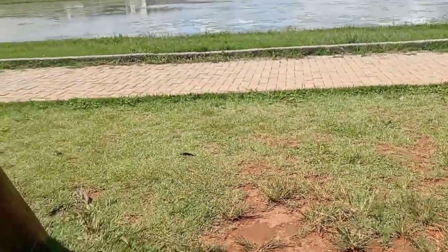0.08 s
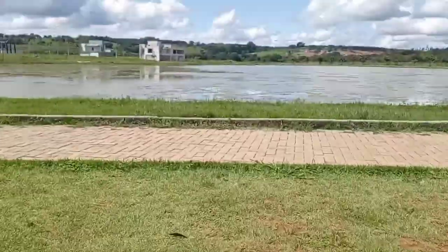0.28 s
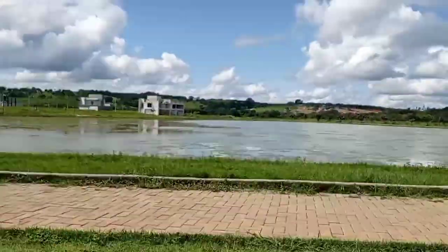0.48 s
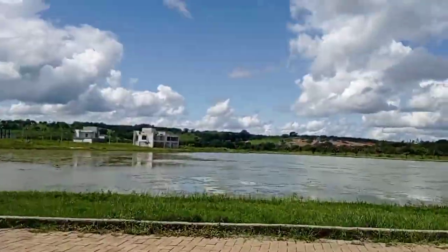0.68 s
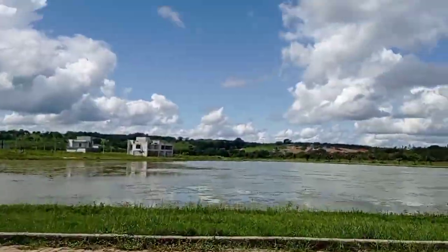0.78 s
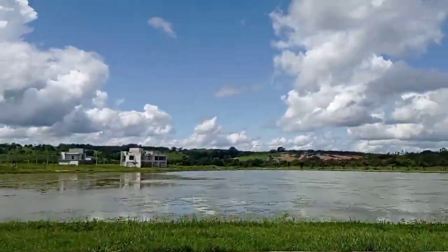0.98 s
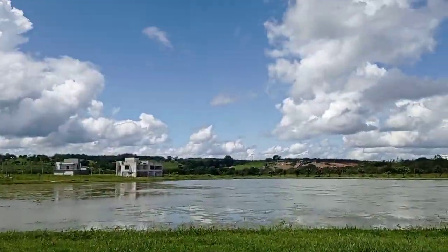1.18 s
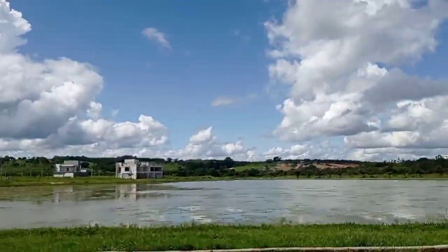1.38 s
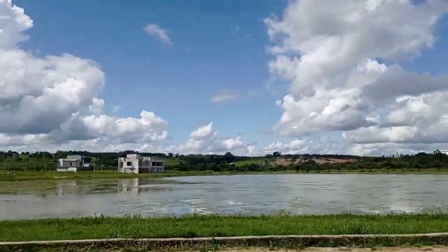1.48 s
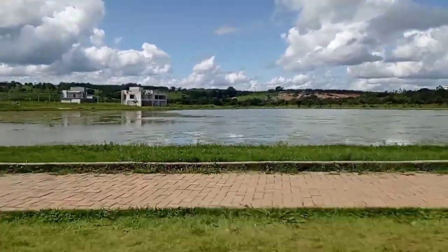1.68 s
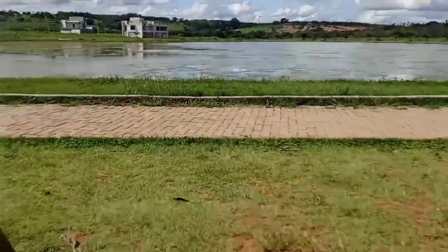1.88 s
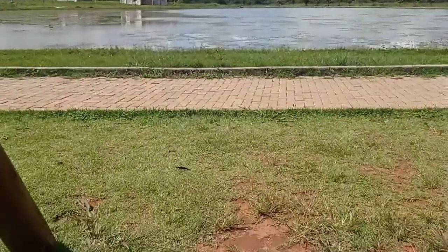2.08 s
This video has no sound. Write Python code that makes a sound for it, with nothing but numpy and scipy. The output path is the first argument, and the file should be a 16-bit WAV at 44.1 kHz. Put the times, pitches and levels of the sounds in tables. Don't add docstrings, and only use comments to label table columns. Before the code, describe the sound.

A rusty playground swing gives a sudden piercing squeal that flutters and fades, then after a quiet gap a burst of harsh yelps, a thin whistle and a low moan; close microphone, quiet open park.

```python
import sys
import numpy as np
from scipy import signal
from scipy.fft import rfft, irfft, next_fast_len
from scipy.io import wavfile
from scipy.ndimage import map_coordinates

SR = 44100
rng = np.random.default_rng(int(sys.argv[2]) if len(sys.argv) > 2 else 0)


def master_out(mix):
    frames = np.transpose(np.atleast_2d(mix))
    ceiling = np.clip(frames, -1, 1)
    pcm = np.round(ceiling * 32767).astype(np.int16)
    wavfile.write(sys.argv[1], SR, pcm)


def makeup_ratio(level_db):
    decades = np.asarray(level_db, float) / 20
    return 10 ** decades


N = 94815
T = np.arange(N) / SR
WAVER, SHIMMER_DB = .0015, .9

# peak_s [s], peak_db [dB], pitch_hz [Hz], growth_s [s]
YELPS = [(1.426, -22, 1002, 0.0057), (1.478, -7.5, 1075, 0.004), (1.508, -13.5, 1100, 0.0075),
         (1.526, -13.5, 1112, 0.0025), (1.555, -14.5, 1092, 0.0061), (1.571, -19, 1100, 0.0019),
         (1.579, -14, 1095, 0.0015), (1.592, -14.5, 1041, 0.0026)]
# peak_s [s], peak_db [dB], pitch_hz [Hz], growth_s [s]
PINGS = [(1.59, -34.5, 6150, 0.0021), (1.615, -24, 6200, 0.0031), (1.634, -25.5, 6120, 0.0035),
         (1.675, -24.5, 6350, 0.0026)]


def unit(x):
    return x / np.sqrt(np.mean(x ** 2) + 1e-20)


def held_curve(rows):
    return np.interp(T, *np.transpose(rows))


def silent_curve(rows):
    return np.interp(T, *np.transpose(rows), -200, -200)


def wobble(rate):
    coarse = np.append(T[::16], T[-1])
    knots = rng.standard_normal(int(N * rate / SR) + 4)
    return np.interp(T, coarse, map_coordinates(knots, [coarse * rate]))


def filtered(x, response):
    m = next_fast_len(N + 8192)
    return irfft(rfft(x, m) * response(np.fft.rfftfreq(m, 1 / SR)), m)[..., :N]


def coloured(spectrum):
    f, v = np.transpose(spectrum)

    def response(hz):
        return makeup_ratio(np.interp(np.log(hz + 1), np.log(f), v, -60, -60))

    return unit(filtered(rng.standard_normal(N), response))


def slip(rows, waver=WAVER):
    s, hz, db = np.transpose(rows)
    phase = 2 * np.pi * np.cumsum(np.interp(T, s, hz) * (1 + waver * wobble(70))) / SR
    return phase, np.interp(T, s, db, -200, -200) + SHIMMER_DB * wobble(90)


def squeal(phase, db, tones=(), extra_db=0, shimmer_db=2, rate=60, base=1):
    full_db = -28
    smear = .45
    on = db > -150
    out = base * makeup_ratio(db) * np.sin(phase)
    for k, level, grows in tones:
        tone_db = level + grows * (db - full_db) + extra_db + shimmer_db * wobble(rate)
        tone_phase = k * phase + smear * wobble(rate) + rng.uniform(0, 2 * np.pi)
        out = out + on * makeup_ratio(tone_db) * np.sin(tone_phase)
    return np.sqrt(2) * out


def swell(s, db, grow):
    break_s = .0013
    return db + 3 - 20 / np.log(10) * np.logaddexp((s - T) / grow, (T - s) / break_s)


def burst(s, db, hz, grow, tones=()):
    phase = 2 * np.pi * hz * np.cumsum(1 + 3 * WAVER * wobble(150)) / SR
    return squeal(phase, swell(s, db, grow), tones, shimmer_db=4.5, rate=220)


def note(s, length, hz, db, glide=0):
    edge_s = .009
    edge = np.clip(np.minimum(T - s, s + length - T) / edge_s + .5, 0, 1)
    start = (s - edge_s, hz * (1 - glide / 2), db)
    end = (s + length + edge_s, hz * (1 + glide / 2), db)
    phase, level = slip([start, end], waver=.007)
    return edge * squeal(phase, level + 3 * wobble(170), [(2, -46.5, 1.2)], shimmer_db=5, rate=150)


def forward_stroke():
    # time_s [s], pitch_hz [Hz], level_db [dB]
    long_start = [(.2, 1170, -60.5), (.213, 1247, -24.5), (.25, 1242, -21.5), (.28, 1257, -30.5),
                  (.308, 1259, -23), (.328, 1238, -42), (.345, 1254, -21.5), (.363, 1243, -21.5),
                  (.372, 1242, -17)]
    long_middle = [(.379, 1233, -21), (.387, 1220, -16.5), (.394, 1220, -26), (.412, 1220, -25.5)]
    long_tail = [(.43, 1235, -31.5), (.47, 1218, -28.5), (.53, 1247, -28.5), (.585, 1239, -26.5),
                 (.74, 1257, -35), (.81, 1242, -38), (.85, 1243, -42), (.935, 1268, -40.5),
                 (.95, 1200, -61)]
    # time_s [s], pitch_hz [Hz], level_db [dB]
    groan_start = [(.2365, 850, -50), (.2405, 845, -12), (.248, 850, -14), (.252, 870, -29),
                   (.259, 875, -15), (.27, 873, -18)]
    groan = [(0.274, 875, -18.5), (0.344, 876.4, -23.5), (0.364, 884, -55)]
    # multiple [times the base], level_db [dB], growth [dB per dB of the base]
    long_even = [(2, -40.5, 0.52), (4, -46.5, 0.82)]
    long_counter = [(3, -50.5, 0.87), (5, -40.5, 0.14), (6, -59, 0.15)]
    groan_tones = [(2, -46, 1), (3, -50, 0.95)]
    # peak_s [s], peak_db [dB], pitch_hz [Hz], growth_s [s]
    sudden = [(.2925, -7, 1010, .0012), (.3085, -13, 1020, .0012)]

    high, high_db = slip(list(long_start) + list(long_middle) + list(long_tail))
    low, low_db = slip(list(groan_start) + list(groan))

    both = np.minimum((high_db + low_db) / 2, 0)
    mix = makeup_ratio(both - 16) * np.sin(high + low)
    mix = mix + makeup_ratio(both - 23) * (np.sin(high + 2 * low) + np.sin(2 * high - low))

    fluttering = np.clip(np.minimum(T - .415, .54 - T) / .01, 0, 1)
    cycle = np.abs(np.cos(np.pi * 43 * (T - .444)))
    beat_db = fluttering * 14 * (cycle - .82)
    high = high + .15 * fluttering * wobble(110)

    dull = -12.5 * np.clip((.413 - T) / .067, 0, 1) - 13 * np.clip((T - .7865) / .019, 0, 1)
    dull = dull + 4 * fluttering * wobble(200.8)
    octave_sinks_db = -9 * np.exp(-((T - .63) / .04) ** 2)

    even = squeal(high, high_db, long_even[:1], dull + octave_sinks_db, shimmer_db=3, rate=70)
    even = even + squeal(high, high_db, long_even[1:], dull, shimmer_db=1, base=0)
    counter = squeal(high, high_db, long_counter, dull, shimmer_db=1.5, base=0)
    singing = makeup_ratio(beat_db) * even + makeup_ratio(-.6 * beat_db) * counter

    sticks_s, stick_width_s = [.835, .871, .922], .006
    moving = np.prod([1 - np.exp(-((T - s) / stick_width_s) ** 4) for s in sticks_s], axis=0)
    groaning = squeal(low, low_db, groan_tones, shimmer_db=4.5, rate=150)
    return moving * singing + groaning + mix + sum(burst(*j, [(2.1, -44.5, .87)]) for j in sudden)


def yelping():
    # peak_s [s], peak_db [dB], pitch_hz [Hz], growth_s [s]
    afters = [(1.4835, -18, 1080, 0.0018), (1.4, -27.5, 1100, 0.0013)]
    # multiple [times the base], level_db [dB], growth [dB per dB of the base]
    yelp_tones = [(1.94, -48.5, 0.58), (2.1, -47.5, 0.45), (3, -62, 0.98), (4.05, -65, 1.07),
                  (5, -62.5, 1.41), (5.8, -59, 1.43), (6.15, -64, 1.34)]
    ping_tones = [(1.152, -37.5, 1)]

    yelps = sum(burst(*y, yelp_tones) for y in list(YELPS) + list(afters))
    return yelps + sum(burst(*p, ping_tones) for p in PINGS)


def last_moan():
    # time_s [s], pitch_hz [Hz], level_db [dB]
    last = [(1.85, 800, -54), (1.857, 760, -38), (1.863, 727, -30), (1.886, 730, -35), (1.902, 752, -35),
            (1.918, 790, -44), (1.93, 745, -39), (1.97, 740, -46), (2.0, 720, -54)]
    # multiple [times the base], level_db [dB], growth [dB per dB of the base]
    low_tones = [(2, -36, .75), (3, -42, .6)]
    high_tones = [(4, -48, 0.79), (5, -48, 0.8), (6, -50, 0.63), (7, -49, 1), (8, -48.5, 1), (9, -55, 0.81)]
    # time_s [s], level_db [dB]
    rasps = [(1.855, 5), (1.868, -3), (1.895, 2), (1.918, 6), (1.93, -3), (2.0, -5)]
    bright = [(1.85, -11), (1.865, -2.5), (1.89, -4), (1.91, -13), (1.96, -8)]

    moan = slip(last)
    out = squeal(*moan, low_tones, held_curve(rasps), shimmer_db=2, rate=77)
    return out + squeal(*moan, high_tones, held_curve(bright), base=0)


def back_stroke():
    # time_s [s], pitch_hz [Hz], level_db [dB]
    lead_in = [(1.428, 1073, -46.5), (1.44, 1134, -41), (1.455, 1144, -36), (1.468, 1127, -27),
               (1.474, 1150, -48)]
    rising = [(1.552, 2335, -39.5), (1.575, 2377, -37), (1.625, 2454, -28.5), (1.655, 2427, -27),
              (1.68, 2505, -27.5), (1.7, 2484, -37), (1.73, 2503, -51.5)]
    lower = [(1.58, 945, -40), (1.612, 956, -27), (1.64, 940.6, -27.5), (1.662, 978.5, -54),
             (1.677, 981.5, -21), (1.695, 948, -32.5), (1.722, 932.5, -31), (1.742, 941, -48),
             (1.8, 930, -43.5)]
    whistle = [(1.672, 6210, -45), (1.682, 6198, -25), (1.722, 6196, -26), (1.732, 6196, -50)]
    # time_s [s], level_db [dB]
    rising_base = [(1.56, -29), (1.6, -32), (1.62, -25), (1.655, -25.5), (1.668, -45), (1.73, -46.5)]
    # multiple [times the base], level_db [dB], growth [dB per dB of the base]
    lower_tones = [(2, -40, 0.6), (3, -44, .9), (5, -51.5, 0.84)]
    # multiple [times the lower hook taken off], level_db [dB]
    whistle_under = [(1, -24), (2, -23.5)]

    twice, twice_db = slip(rising, waver=.003)
    twice_db = twice_db + 4 * (T < 1.625) * wobble(160)
    out = squeal(twice, twice_db, [(1.5, -48, .61), (2.5, -50, .65)], shimmer_db=5, rate=120)
    out = out + squeal(twice / 2, silent_curve(rising_base))

    low, low_db = slip(lower)
    out = out + squeal(low, low_db, lower_tones, -12 * (T > 1.74), shimmer_db=4, rate=130)

    top, top_db = slip(whistle, waver=.0017)
    out = out + squeal(top, top_db) + squeal(top + low, top_db - 7.5)
    out = out + sum(squeal(top - k * low, top_db + db + 3 * wobble(150)) for k, db in whistle_under)

    out = out + squeal(*slip(lead_in), [(1.8, -45, 1)])
    return out + yelping() + last_moan()


def squeaks():
    chirps = [(.258, .062, 1018, -30, 0), (.262, .068, 1146, -29, 0), (.283, .035, 1084, -29, 0),
              (.365, .1, 1885, -49, 0), (.262, .045, 808, -32, 0), (.28, .04, 2290, -39, .02),
              (.333, .024, 2153, -41, 0), (.216, .04, 2492, -43, 0), (.325, .03, 1657, -43, 0),
              (.31, .05, 513, -46, 0), (1.728, .062, 1565, -39, -.012), (1.745, .02, 1090, -35, .1),
              (1.757, .062, 1355, -36.5, .012), (1.82, .028, 1372, -47, 0), (1.765, .036, 1205, -45, .035),
              (1.809, .016, 1195, -33, .06), (1.83, .026, 1155, -35, 0), (1.795, .03, 1010, -49, .015),
              (1.835, .022, 935, -49, 0), (1.757, .028, 7105, -51, 0), (1.405, .02, 1630, -50, 0)]
    return sum(note(*c) for c in chirps)


def grit():
    # time_s [s], level_db [dB]
    efforts = [
        [(.236, -40), (.241, -30), (.26, -32), (.295, -31), (.355, -37), (.37, -38), (.55, -55.5)],
        [(1.55, -52.5), (1.6, -35), (1.65, -42.5), (1.685, -36), (1.73, -48.5), (1.77, -44), (1.83, -49.5),
         (1.86, -43.5), (1.93, -51)],
        [(1.385, -61), (1.415, -48), (1.44, -63)],
    ]
    # time_s [s], level_db [dB]
    flutter_rasp = [(.36, -46.5), (.43, -51), (.52, -53), (.545, -70)]
    # pitch_hz [Hz], level_db [dB]
    scrape_colour = [(500, -18), (800, -6), (1200, -1), (1600, -11), (2500, -11), (3800, -19.5),
                     (6000, -12), (7500, -28)]
    rasp_db, ping_grit_db, ping_rasp_db = -26.5, -17, -4.5

    effort = sum(makeup_ratio(silent_curve(g)) for g in efforts)
    yelps = sum(makeup_ratio(swell(s, db, grow)) for s, db, hz, grow in YELPS)
    pings = sum(makeup_ratio(swell(s, db, grow)) for s, db, hz, grow in PINGS)

    clumps = makeup_ratio(3.5 * wobble(330))
    scrape = unit(coloured(scrape_colour) * clumps)
    scrape_level = effort + makeup_ratio(rasp_db) * yelps + makeup_ratio(ping_grit_db) * pings

    pin = coloured([(4500, -22.5), (5600, -9), (6300, 5), (7200, -13), (8300, -8.5)])
    pin_level = makeup_ratio(silent_curve(flutter_rasp))
    pin_level = pin_level + makeup_ratio(rasp_db - 2) * yelps + makeup_ratio(ping_rasp_db) * pings
    return scrape_level * scrape + pin_level * pin


def link_ticks():
    ticks = [(.188, -34, 2.5), (1.147, -31, 2.2), (2.036, -34, 1), (2.056, -36, 1.08), (2.074, -41, 1.04)]
    # pitch_hz [Hz], level_db [dB], t60_s [s to fade by 60 dB]
    link = [(950, -1, 0.06), (1100, 1.5, 0.023), (1407, -5, 0.024), (2170, -11.5, 0.0081),
            (4370, -18, 0.0079)]

    out, t = np.zeros(N + SR), T[:SR // 8]
    for s, db, ratio in ticks:
        ring = 0
        for hz, level, t60 in link:
            fade = makeup_ratio(level + rng.normal(0, 2) - 60 * t / t60)
            ring = ring + fade * np.sin(2 * np.pi * min(hz * ratio, 7500) * t)
        out[round(s * SR):][:len(t)] += makeup_ratio(db - 6.5) * ring
    return out[:N]


def seat_thumps():
    thumps = [(1.58, -37), (1.835, -40), (1.31, -49)]
    push = 0
    for s, db in thumps:
        v = np.clip((T - s) / .016, 0, None)
        push = push + makeup_ratio(db) * np.e * v * np.exp(-v)
    return push * coloured([(60, -11.5), (140, 1.5), (330, -12)])


def echo(swing):
    t60_s, level_db = .09, -16
    t = T[:SR // 4]
    tail = rng.standard_normal(len(t)) * makeup_ratio(-60 * t / t60_s)
    return makeup_ratio(level_db) * signal.fftconvolve(swing, tail / np.linalg.norm(tail))[:N]


def far_birds():
    birds = [(2.085, .03, 4680, -60, -.04), (1.32, .03, 4600, -63, -.02), (1.393, .012, 4000, -60, .04),
             (.838, .025, 5750, -62, -.08), (.845, .02, 6800, -64, -.05), (.872, .03, 6300, -60, -.02),
             (.875, .02, 5750, -63, -.04)]
    return sum(note(*b) for b in birds)


def air():
    # pitch_hz [Hz], level_db [dB]
    air_colour = [(30, -23), (60, -3), (150, -2), (230, -7.5), (470, -11), (1280, -16), (6400, -24.5),
                  (8300, -44)]
    # pitch_hz [Hz], width_hz [Hz], level_db [dB]
    machines = [(118, 28, -56), (190, 16, -62), (475, 18, -64), (2450, 650, -53.5)]
    # time_s [s], gain_db [dB]
    gain = [(.24, 0), (.45, -3), (.82, -5), (.85, 0), (1.45, 0), (1.55, -3), (2.0, -2.5), (2.05, -1)]

    bed = makeup_ratio(-46.5 + 1.6 * wobble(15) + wobble(80)) * coloured(air_colour)
    for hz, width, db in machines:
        hum = filtered(rng.standard_normal(N), lambda f: 1 / (1 + ((f - hz) / width) ** 2))
        bed = bed + makeup_ratio(db) * unit(hum)
    return makeup_ratio(held_curve(gain)) * bed


def scene():
    swing = forward_stroke() + back_stroke() + squeaks() + grit() + link_ticks() + seat_thumps()
    return (swing + echo(swing) + far_birds() + air())[None]


def top_cut(x):
    return signal.sosfilt(signal.butter(12, 8370, fs=SR, output="sos"), x)


def record(dry):
    def response(hz):
        treble = makeup_ratio(-.035 * np.clip(hz - 7500, 0, None)) * (hz < 8370)
        return treble / (1 + (44 / (hz + 1)) ** 6)

    return top_cut(filtered(dry, response))


dry = scene()
out = record(dry)
master_out(out)
```